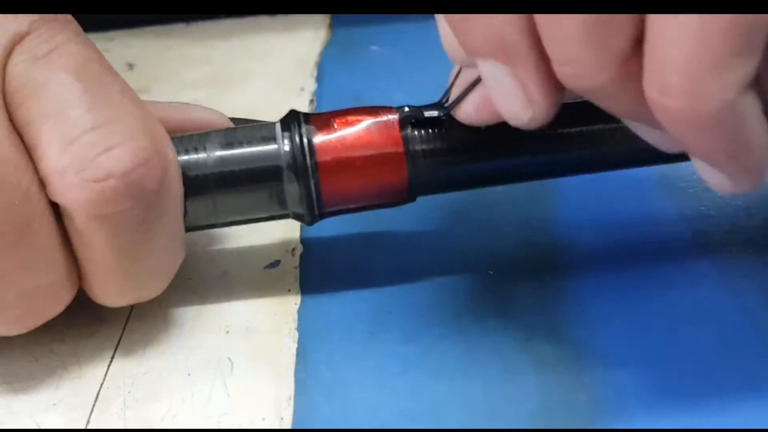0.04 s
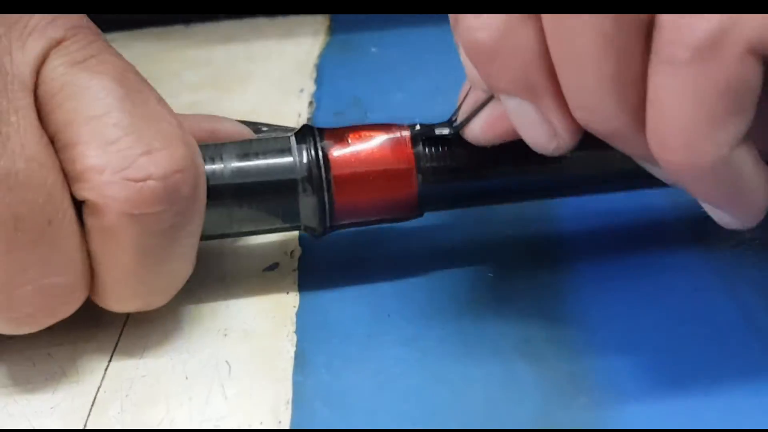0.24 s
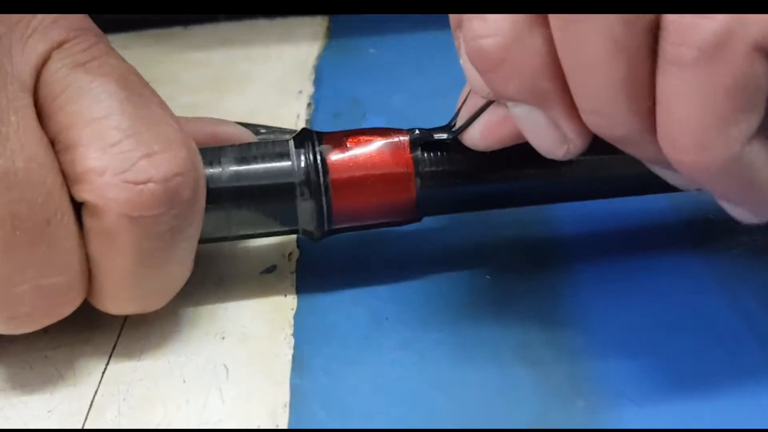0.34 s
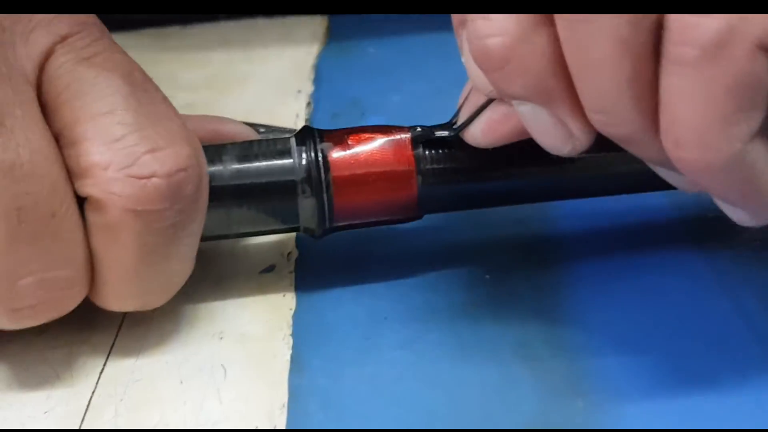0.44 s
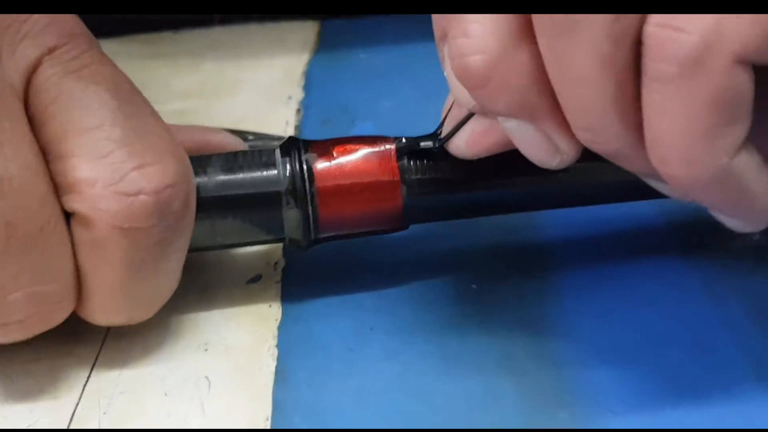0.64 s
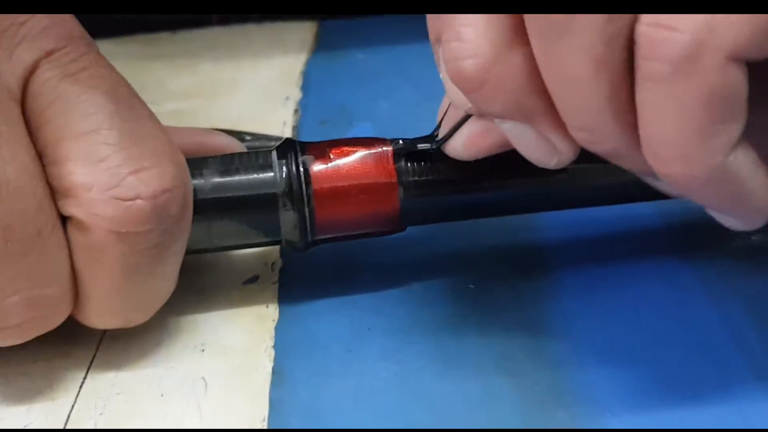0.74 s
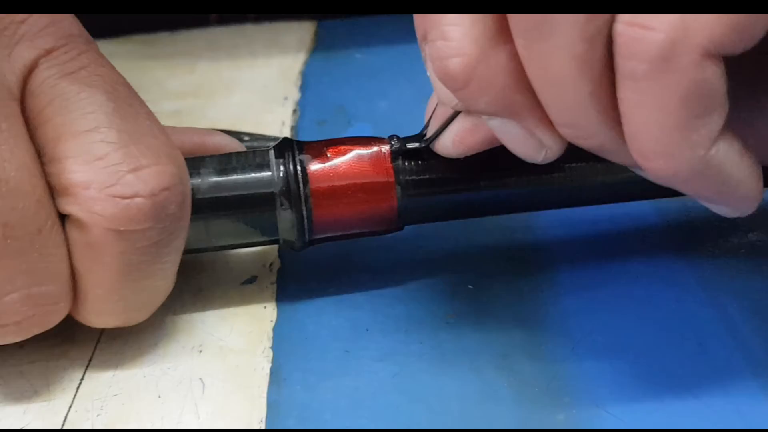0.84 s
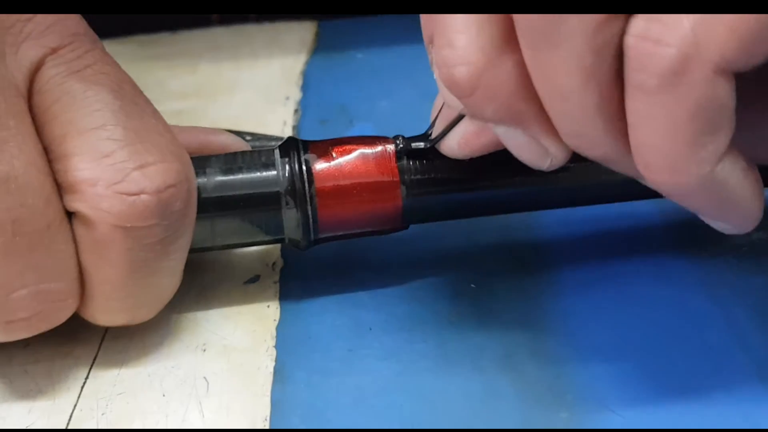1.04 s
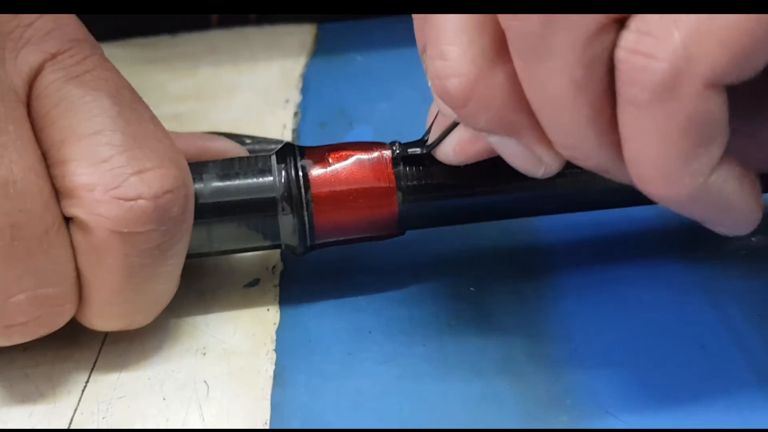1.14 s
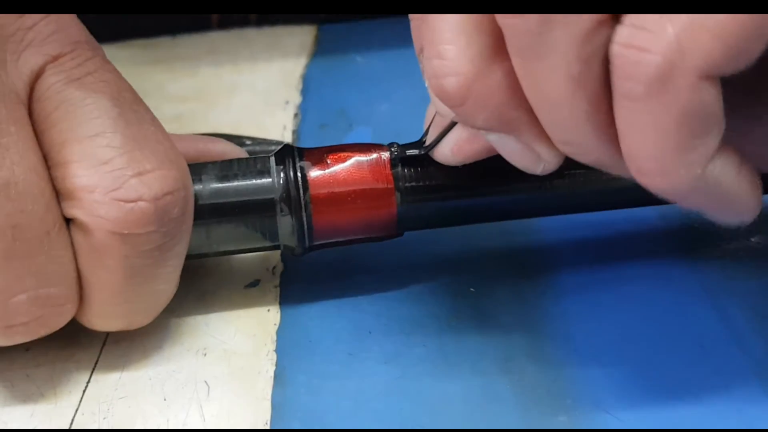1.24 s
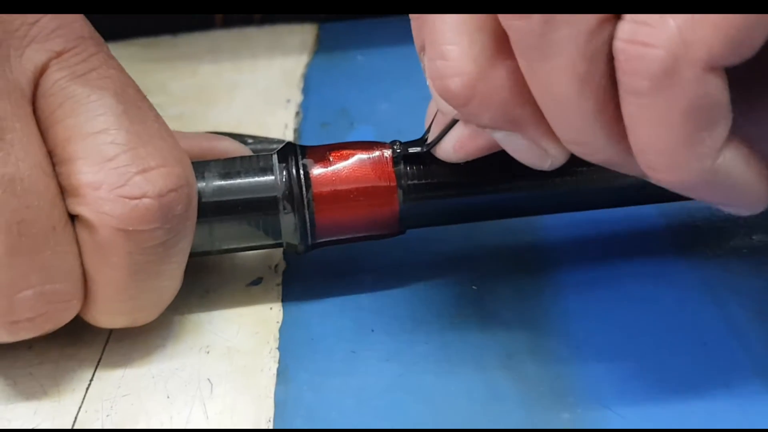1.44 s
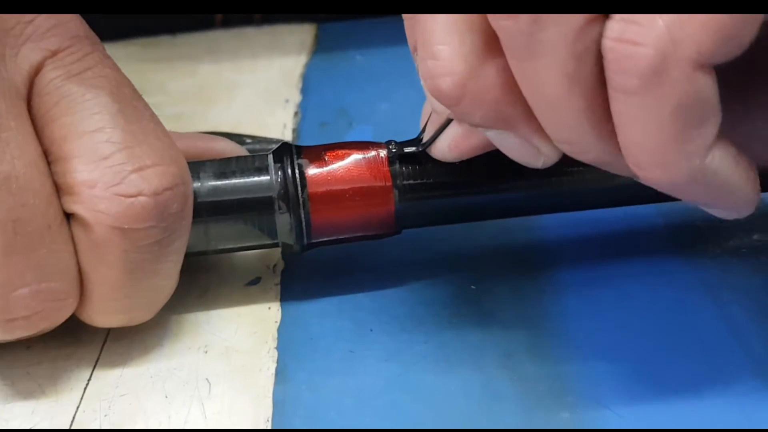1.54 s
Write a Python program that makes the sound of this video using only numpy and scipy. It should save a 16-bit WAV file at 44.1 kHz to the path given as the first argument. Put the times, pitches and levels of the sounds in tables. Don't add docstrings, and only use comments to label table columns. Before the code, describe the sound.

Fishing rod knocking on a wooden workbench, heard close in a small room. A faint hand slide along the tube opens, then a loud, hollow, low thud at 0.23 s, with clattering bounces, wire ticks and a short gritty drag until about 0.37 s. Quiet handling rumble follows. A weaker, shorter knock lands at 0.8 s, then soft low bumps around 0.96-1.13 s fade into faint hiss.

```python
import sys
import numpy as np
from scipy import signal
from scipy.fft import rfft, irfft, next_fast_len
from scipy.io import wavfile
from scipy.ndimage import map_coordinates

SR = 44100
rng = np.random.default_rng(int(sys.argv[2]) if len(sys.argv) > 2 else 0)


def dump(signal):
    limited = np.clip(np.atleast_2d(signal).T, -1, 1)
    pcm = np.round(limited * 32767).astype(np.int16)
    wavfile.write(sys.argv[1], SR, pcm)


def ratio_of_db(decibels):
    return 10 ** (np.asarray(decibels, float) / 20)


N = 70560

# t/s, level/dB, shudder level/dB, shudder t60/s
KNOCKS = [
    (.227, -6.5, -18, 0.32),
    (0.799, -12.5, -21.5, 0.094),
]
# f/Hz, level/dB, t60/s
FIRST_BENCH_MODES = [(72.6, -47, 0.26), (131.3, 4, 0.11), (175.8, 1, 0.17), (292.2, 2, 0.11),
                     (401, -15, 0.066), (484.4, -10, 0.14), (578, -14, 0.19), (683, -2, 0.057),
                     (852, -2, 0.03), (974, -14, 0.092), (1124, -9.5, 0.024), (1320, -33, 0.0133),
                     (1980, -39, 0.032), (2720, -29, 0.025)]
# f/Hz, level/dB, t60/s
SECOND_BENCH_MODES = [(66, -3.5, .15), (121.4, 1, 0.083), (191, -4.5, 0.038), (281, -4.5, 0.088),
                      (401, -5.5, 0.079), (489, 1, 0.043), (657, -18, 0.087), (747, -19.5, 0.097),
                      (930, -43, 0.068), (1133, -18.5, 0.037), (1282, -17.5, 0.047), (2270, -23.5, 0.034),
                      (3010, -22, 0.016)]
# f/Hz, density/(dB per Hz)
SHUDDER_SPECTRUM = [(150, -21), (400, 16), (1200, -4), (2500, -22.5), (5000, -41.5), (15000, -43)]
NODE_HZ = 230
SOFT_S = 0.00058

# t/s, thud level/dB, tube level/dB, sharpness/(dB per octave)
CONTACTS = [(.2265, -66.5, -42, 2), (0.2636, -12.5, -27, -1), (.275, -58, -39.5, -7.5),
            (0.2822, -21.5, -57, 9.5), (0.2855, -48, -35, -2), (0.2941, -31, -44, -10),
            (0.3065, -31, -35.5, -2.5), (0.3223, -25.5, -32.5, 2), (.341, -48, -36.5, -6),
            (.346, -41, -38.5, -5.5), (0.3511, -29, -40.5, 2), (0.3655, -29, -43, 1), (0.443, -52, -62, 5),
            (0.551, -75, -62, 2), (0.6148, -65, -68, 9.5), (0.6325, -68, -68, 7), (0.678, -76, -57, -2.5),
            (0.7973, -23.5, -34.5, -1.5), (0.8, -48, -47.5, 6), (.818, -60, -47, -9.5),
            (.8355, -50, -56, 3), (0.961, -36, -68, 6.5), (1.027, -58, -49.5, 2.5), (1.05, -42, -63, 4),
            (1.088, -39, -54, -1.5), (1.1965, -58, -64, 6.5), (1.262, -56.5, -58.5, 2),
            (1.357, -65, -67, -1), (1.3685, -67, -66.5, 8)]
# f/Hz, level/dB, t60/s
TUBE_MODES = [(1070, 0, 0.039), (1510, -9.5, 0.037), (2052, -5, 0.022), (2775, -7, .015), (3860, -35, 0.02),
              (4730, -23.5, 0.021), (7100, -19, 0.008)]
# f/Hz, density/(dB per Hz), t60/s
BURST_BANDS = [(315, 1.5, 0.15), (1030, 5.5, 0.018), (1880, -10, 0.048), (3700, -15.5, 0.017),
               (7500, -21, 0.014), (12800, -29, 0.008), (15900, -37, .008)]
SCATTER_DB, BURST_DB, ATTACK_S = 4.5, 3, 0.00026

# t/s, level/dB, f/Hz, t60/s
TICKS = [(.2638, -28, 4900, .01), (.2655, -44, 7500, 0.0047), (.282, -42, 7050, 0.011),
         (.287, -24, 2120, 0.019), (.3065, -39, 3300, .008), (.3218, -37.5, 7480, .012),
         (.325, -39.5, 4500, 0.017), (.3405, -41, 3050, 0.0099), (.346, -42, 4860, 0.0052),
         (.3645, -48, 7400, 0.0097), (.462, -50, 4500, 0.0056), (.484, -67, 8500, .005),
         (.55, -56, 11000, .004), (.633, -52, 6340, .008), (.666, -54, 8000, 0.0086),
         (.70, -58, 8000, 0.0087), (.727, -57.5, 7500, 0.0051), (.77, -62, 8500, .006),
         (.7965, -36, 2840, .008), (.815, -58, 6660, 0.036), (.853, -59, 6500, .04),
         (.929, -49, 4850, 0.005), (1.179, -57, 1610, .015), (1.262, -49, 1210, 0.011),
         (1.357, -49.5, 1490, 0.018), (.324, -47.5, 3820, .14), (.799, -55, 3860, 0.12),
         (.3405, -32, 2050, 0.026), (.275, -36, 2000, .012), (0.9597, -42, 900, 0.016),
         (.8185, -37, 1500, .015), (.3222, -29, 690, .015), (.8355, -54, 7500, .012),
         (.804, -52, 10000, .012), (.228, -50, 9300, .02), (.347, -28, 480, .03)]
TICK_SPREAD = 0.13

# t of peak/s, level/dB, f/Hz, rise/s
ROCKS = [(.2654, -9, 400, 0.004), (.284, -19, 205, .012), (.326, -21, 160, .018), (.314, -24, 265, .01),
         (.42, -30, 70, .02), (.43, -47, 1100, .05), (.58, -63, 1320, .07), (.802, -24, 590, .005),
         (.236, -16, 310, .006), (.832, -28, 230, .012), (.828, -28, 490, .01), (.861, -30, 490, .01),
         (.894, -33, 430, .008), (1.09, -48, 1580, .01), (1.36, -42, 190, .03), (.811, -24, 280, .006),
         (.272, -17.5, 84.5, 0.013), (.87, -34, 188, .03), (.009, -33, 62, 0.017), (0.501, -34, 78, .02),
         (.61, -44, 88.6, 0.075), (0.849, -33.5, 65, 0.031), (1.018, -36.5, 672, 0.0044),
         (1.054, -21.5, 323, 0.0028), (1.369, -34.5, 93, 0.015), (0.354, -15, 166.6, 0.0062),
         (0.469, -32, 175.6, 0.036), (0.966, -26, 182, .01), (.977, -22, 190, 0.003),
         (1.017, -21, 192, 0.023), (1.064, -22, 204, 0.006), (1.084, -29, 210, 0.011),
         (1.132, -31.5, 188, 0.02)]
ROCK_FALL = 1

# start t/s, end t/s, level/dB, rise/s, fall/s
DRAGS = [
    (0.292, 0.348, -42.5, .003, 0.037),
    (0.803, 0.818, -43, .002, 0.009),
    (0.956, 1.092, -59.5, .02, 0.22),
]
# f/Hz, density/(dB per Hz)
GRIT_SPECTRUM = [(350, -10), (600, 10), (902, -26), (1470, 6.5), (1730, -8.5), (2010, -7), (3570, -24),
                 (7640, -33), (15500, -46.5)]
# f/Hz, density/(dB per Hz)
SLIDE_SPECTRUM = [(150, -20), (280, -2), (1180, -8), (2000, -16.5), (7000, -29), (8600, -39), (13000, -35),
                  (15500, -48)]
SLIDE_END_S, SLIDE_DB, SLIDE_FALL_S = 0.13, -45.5, 0.036
PIPE_HZ, PIPE_DEPTH = 1103, 0.21

# start t/s, end t/s, level/dB, rise/s, fall/s
RUSTLE = [(0.157, 0.23, -68, .01, 0.03), (0.257, 0.403, -57.5, 0.008, 0.034),
          (0.434, 0.545, -65.5, 0.021, 0.03), (0.6, 0.773, -65.5, 0.021, 0.014),
          (0.791, 0.875, -66.5, 0.0061, 0.088), (0.947, 1.097, -69, .03, 0.17),
          (1.239, 1.302, -63.5, 0.011, 0.023), (1.5, 1.6, -84.5, 0.015, .02)]
# f/Hz, density/(dB per Hz)
RUSTLE_SPECTRUM = [(1180, -1), (2000, 0.5), (2440, -13), (3230, -8), (7960, -7.5), (9290, -11.5),
                   (12500, -11), (15600, -12.5)]
# t/s, level/dB
HANDLING = [(0.0, -45), (0.266, -46.5), (0.4, -39), (0.596, -51.5), (0.842, -46), (0.966, -38),
            (1.016, -35), (1.144, -41.5), (1.292, -45.5), (1.6, -43.5)]
# f/Hz, density/(dB per Hz)
RUMBLE_SPECTRUM = [(13, -31), (22, 1), (145, -3.5), (178, -4), (213, -16.5), (246, -6.5), (416, -15),
                   (500, -15), (2800, -42), (3640, -78), (6160, -120)]
# f/Hz, density/(dB per Hz)
HISS_SPECTRUM = [(1200, -4), (2000, 1.5), (2600, -13), (4000, -12.5), (7500, -7.5), (10500, -12),
                 (12500, -18.5), (15600, -24)]
HISS_DB = -67.5

# f/Hz, t60/s
ROOM_DECAY = [(80, 0.85), (200, 0.73), (600, 0.42), (2000, 0.37), (8000, 0.28)]
ROOM_DB, ROOM_DELAY_S, ROOM_THIN_HZ = -9, .004, 250
TOP_HZ, ROLLOFF_HZ = 15700, 14150


def along(points, hz):
    f, value = np.transpose(points)
    return np.interp(np.log(hz + 1), np.log(f + 1), value)


def unit(x):
    return x / np.sqrt(np.mean(x ** 2) + 1e-20)


def wobble(rate):
    knots = rng.standard_normal(int(N * rate / SR) + 4)
    return map_coordinates(knots, [np.arange(N) * rate / SR])


def swell(start, end, rise, fall):
    t = np.arange(N) / SR
    return np.clip((t - start) / rise, 0, 1) * np.exp(-np.maximum(t - end, 0) / fall)


def add(track, s, sound):
    part = track[round(s * SR):][:len(sound)]
    part += sound[:len(part)]


def noise(spectrum, comb=0.):
    hz = np.fft.rfftfreq(N, 1 / SR)
    pipe = 1 / np.abs(1 - np.clip(comb, 0, .9) * np.exp(-2j * np.pi * hz / PIPE_HZ))
    white = rfft(rng.standard_normal(N))
    return unit(irfft(white * ratio_of_db(along(spectrum, hz)) * pipe, N))


def ring(modes, tilt_db=0., scatter_db=0., shorten=0.92, inward_hz=0.):
    t = np.arange(SR // 3) / SR
    hz, db, t60 = np.transpose(modes)[:, :, None]
    chance = rng.standard_normal((2, len(modes), 1))
    hz = hz * (1 + 0.0053 * scatter_db * chance[0])
    level = db + tilt_db * np.log2(hz / 2000) + scatter_db * chance[1]
    decay = ratio_of_db(level - 60 * t / (t60 * shorten))
    polarity = np.sign(hz - inward_hz)
    return (polarity * decay * np.sin(2 * np.pi * hz * t)).sum(0) * (1 - np.exp(-t / ATTACK_S))


def burst(tilt_db):
    size = SR // 10
    t = np.arange(size) / SR
    log_f = np.log(np.fft.rfftfreq(size, 1 / SR) + 1)
    hz, db, t60 = np.transpose(BURST_BANDS)[:, :, None]
    share = np.array([np.interp(log_f, np.log(hz[:, 0]), row) for row in np.eye(len(BURST_BANDS))])
    bands = irfft(rfft(rng.standard_normal(size)) * share, size)
    level = db + tilt_db * np.log2(np.maximum(hz, 1500) / 2000) - 60 * t / t60
    return 5.58 * (bands * ratio_of_db(level)).sum(0) * np.tanh(t / ATTACK_S)


def knocks():
    out, t = np.zeros(N), np.arange(N) / SR
    benches, sides = (FIRST_BENCH_MODES, SECOND_BENCH_MODES), (1, -1)
    for (s, db, shudder_db, t60), bench, side in zip(KNOCKS, benches, sides):
        add(out, s, side * ratio_of_db(db) * ring(bench, inward_hz=NODE_HZ))
        shudder_level = ratio_of_db(shudder_db - 60 * t / t60 + 0.92 * wobble(150))
        add(out, s, shudder_level * noise(SHUDDER_SPECTRUM) * np.tanh(t / SOFT_S) ** 2)
    return out


def contacts():
    out = np.zeros(N)
    upper_modes = SECOND_BENCH_MODES[2:]
    for s, thud_db, tube_db, tilt_db in CONTACTS:
        thud = ring(upper_modes, 1.0, SCATTER_DB, shorten=0.52, inward_hz=350)
        add(out, s, ratio_of_db(thud_db + 5.0) * thud)
        add(out, s, ratio_of_db(tube_db - 1.63 * tilt_db) * ring(TUBE_MODES, 0, SCATTER_DB))
        add(out, s, ratio_of_db(tube_db + BURST_DB) * burst(tilt_db))
    return out


def rocking():
    out, t = np.zeros(N), np.arange(N) / SR
    for s, db, hz, rise in ROCKS:
        width = np.where(t < s, rise, ROCK_FALL * rise)
        out += ratio_of_db(db) * np.exp(-((t - s) / width) ** 2) * np.cos(2 * np.pi * hz * (t - s))
    return out


def ticks():
    out, t = np.zeros(N), np.arange(SR // 20) / SR
    chances = rng.uniform(-0.8, 1, (len(TICKS), 4, 1))
    for (s, db, hz, t60), chance in zip(TICKS, chances):
        spread = TICK_SPREAD * np.clip(0.0085 / t60, .05, 2)
        partials = np.sin(2 * np.pi * hz * (1 + spread * chance) * t).sum(0)
        add(out, s, ratio_of_db(db - 7.5 - 60 * t / t60) * partials * np.tanh(t / ATTACK_S))
    return out


def rubbing():
    press = sum(ratio_of_db(db) * swell(a, b, rise, fall) for a, b, db, rise, fall in DRAGS)
    roughness = ratio_of_db(6.3 * wobble(250) + 3.1 * wobble(50.55))
    grit = unit(noise(GRIT_SPECTRUM, comb=0.44) * roughness)
    slide = noise(SLIDE_SPECTRUM, comb=PIPE_DEPTH) * ratio_of_db(1.5 * wobble(35.0))
    hand = ratio_of_db(SLIDE_DB) * swell(-1.5, SLIDE_END_S, 1, SLIDE_FALL_S)
    return press * grit + hand * slide


def room(x):
    hz, t, z = signal.stft(rng.standard_normal(SR), SR, nperseg=512)
    decay = ratio_of_db(-60 * t / along(ROOM_DECAY, hz)[:, None])
    thin = (hz / (hz + ROOM_THIN_HZ))[:, None]
    tail = signal.istft(z * decay * thin, SR, nperseg=512)[1]
    delayed = np.pad(x, (round(ROOM_DELAY_S * SR), 0))
    return signal.fftconvolve(delayed, tail / np.linalg.norm(tail))[:N]


def workshop():
    rumble_db = np.interp(np.arange(N) / SR, *np.transpose(HANDLING)) + 2.24 + 1.95 * wobble(25.67)
    rustle = sum(ratio_of_db(db) * swell(a, b, rise, fall) for a, b, db, rise, fall in RUSTLE)
    rumble = ratio_of_db(rumble_db) * noise(RUMBLE_SPECTRUM)
    return rumble + rustle * ratio_of_db(0.99 * wobble(60)) * noise(RUSTLE_SPECTRUM)


def hiss():
    return ratio_of_db(HISS_DB + 1.2 * wobble(30)) * noise(HISS_SPECTRUM)


def scene():
    near = knocks() + contacts() + rubbing()
    hum = rocking() * ratio_of_db(1.43 * wobble(120))
    reverberant = ratio_of_db(ROOM_DB) * room(near + 0.54 * hum)
    return (near + hum + reverberant + ticks() + workshop() + hiss())[None]


def top_cut(x):
    return signal.sosfilt(signal.butter(12, 15700, fs=SR, output="sos"), x)


def record(dry):
    size = next_fast_len(N + SR // 4)
    hz = np.fft.rfftfreq(size, 1 / SR)
    low_cut = (1j * hz / (42 + 1j * hz)) ** 2
    x = irfft(rfft(dry, size) * low_cut, size)
    x = x / (1 + np.abs(x / .98) ** 4.5) ** (1 / 4.5)
    high_cut = (hz < TOP_HZ) / (1 + (hz / ROLLOFF_HZ) ** 6)
    mix = irfft(rfft(x) * high_cut, size)[:, :N]
    return top_cut(mix)


dry = scene()
out = record(dry)
dump(out)
```